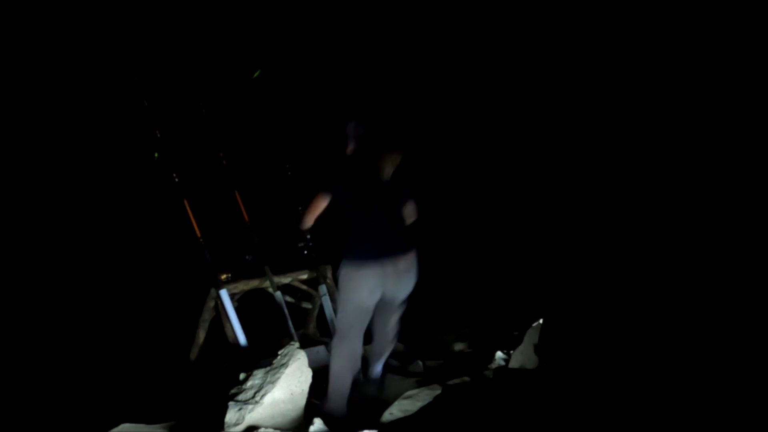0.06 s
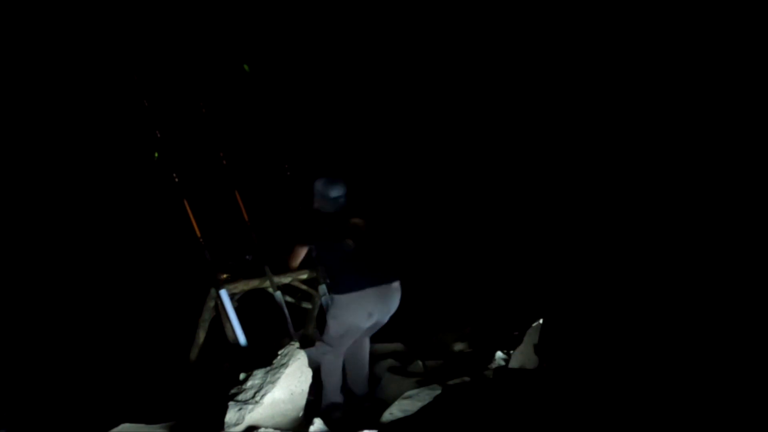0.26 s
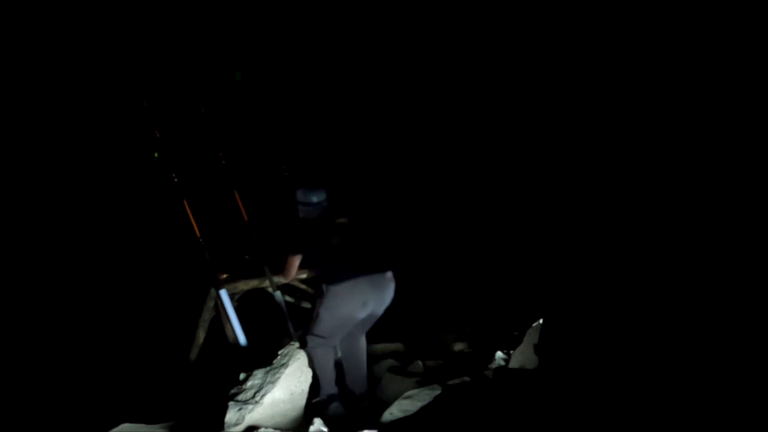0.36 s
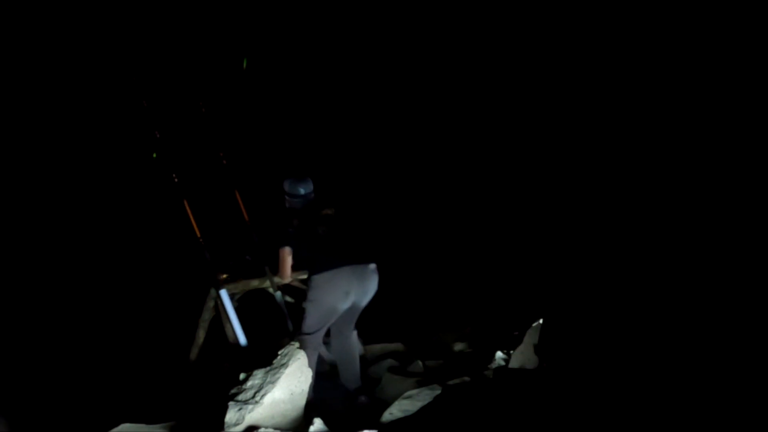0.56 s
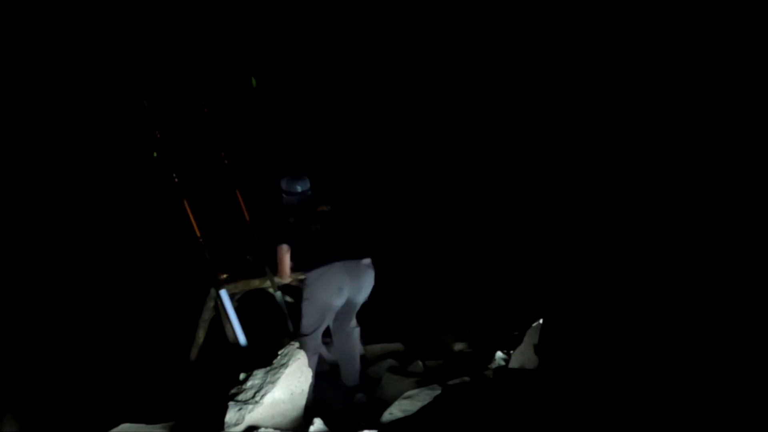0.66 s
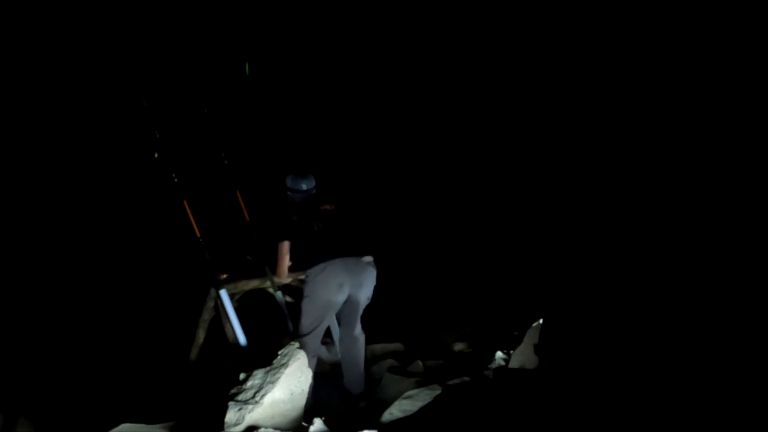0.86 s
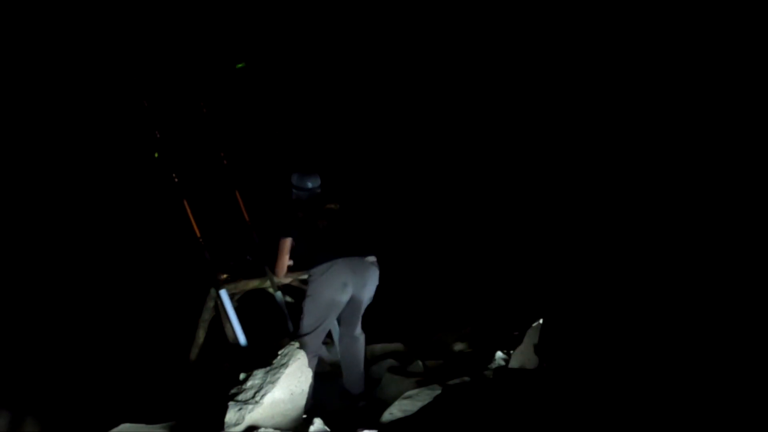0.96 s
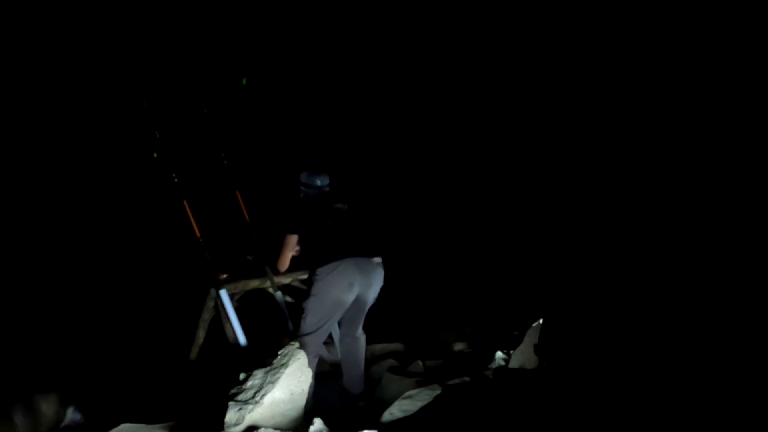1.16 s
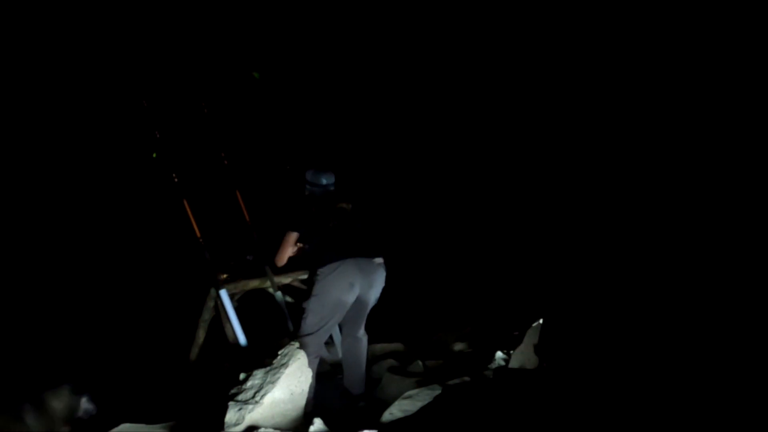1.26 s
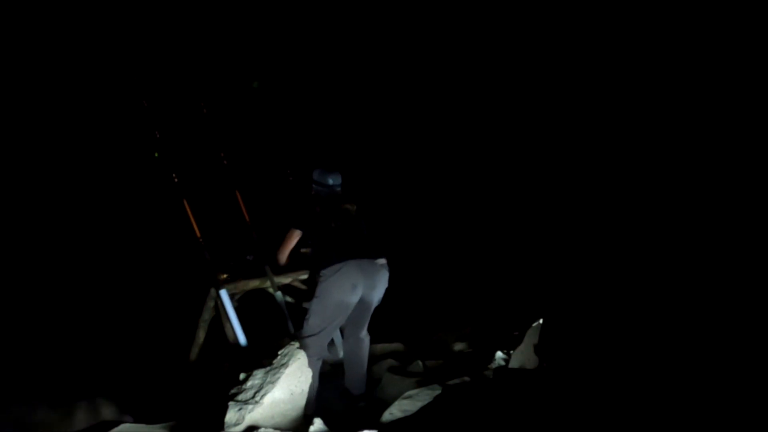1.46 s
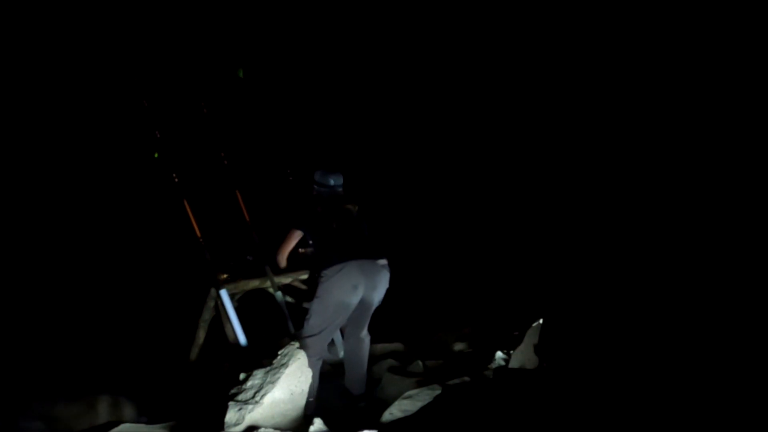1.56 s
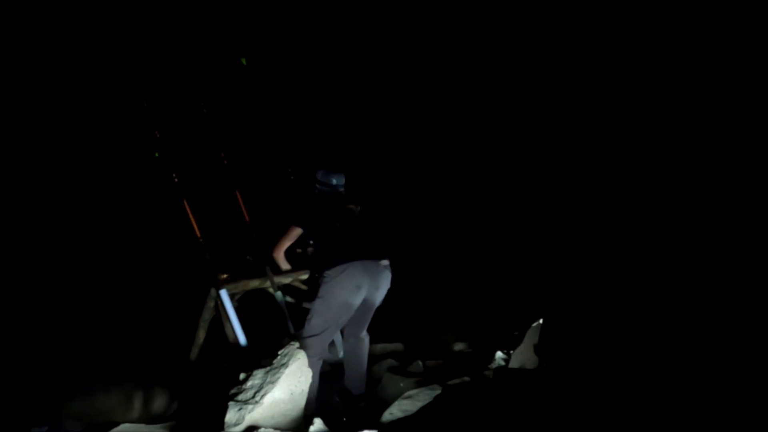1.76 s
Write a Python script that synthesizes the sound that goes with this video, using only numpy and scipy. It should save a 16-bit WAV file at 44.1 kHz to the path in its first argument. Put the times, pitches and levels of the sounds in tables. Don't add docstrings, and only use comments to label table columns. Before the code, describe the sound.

Lake water laps and trickles over shore rocks, with a hollow double knock of a rod near the start

```python
import sys
import numpy as np
from scipy import signal
from scipy.fft import rfft, irfft
from scipy.io import wavfile

SR = 44100
rng = np.random.default_rng(int(sys.argv[2]) if len(sys.argv) > 2 else 0)


def file_out(sig):
    cols = np.atleast_2d(sig).T
    lim = np.clip(cols, -1, 1)
    pcm = np.round(lim * 32767).astype(np.int16)
    wavfile.write(sys.argv[1], SR, pcm)


def magnitude_from_level(level_db):
    exponent = np.asarray(level_db, float) / 20
    return 10 ** exponent


N = 79380

# (frequency [Hz], level per Hz [dB])
NIGHT_COLOUR = [(24, -40), (40, -67), (93, -21), (186, 0.5), (745, -25.5), (1030, -10), (3470, -17.5),
                (7290, -27), (15000, -42)]
# (time [s], peak level [dB], pitch [Hz])
WIND_PUFFS = [(0.06, -47.5, 29.8), (0.186, -31.5, 55), (0.231, -38, 74), (0.28, -27.5, 55),
              (0.331, -42.5, 69.5), (0.851, -52.5, 31.4), (0.9, -62, 35), (0.975, -55, 35),
              (1.03, -43, 35.7), (1.074, -57.5, 52), (1.209, -38.5, 101), (1.531, -47.5, 34.2),
              (1.565, -50, 34.4), (1.603, -41.5, 112), (1.659, -58, 35)]
# (time [s], level [dB])
GURGLE_FLOW = [(0, -70), (.1, -54.5), (.2, -45.5), (.3, -38), (.36, -52), (.4, -37), (.46, -52), (.55, -74),
               (.62, -59), (.72, -61.5), (.85, -64.5), (1.03, -63.5), (1.22, -60), (1.38, -80.5),
               (1.6, -65.5), (1.8, -67.5)]
# (time [s], peak level [dB], pitch [Hz], decay t60 [s])
AIR_GULPS = [(0.02, -49, 258.5, 0.088), (0.087, -34.5, 269.4, 0.082), (0.118, -48.5, 440, 0.044),
             (0.135, -38.5, 288, 0.091), (0.174, -34, 200, 0.035), (0.203, -37, 272, 0.21),
             (0.235, -28.5, 352, 0.038), (0.277, -17, 190.4, 0.032), (0.281, -21.5, 424, 0.027),
             (0.301, -31.5, 437, 0.034), (0.331, -49, 168, 0.043), (0.479, -51, 173, 0.051),
             (0.538, -42.5, 305, 0.009), (0.557, -52, 173, 0.081), (0.625, -52, 126, 0.049),
             (0.701, -41.5, 162.5, 0.03), (0.774, -51.5, 221.4, 0.077), (0.828, -53, 174, 0.077),
             (0.899, -52, 302, 0.076), (0.95, -54.5, 220, 0.054), (1.031, -42.5, 217, 0.03),
             (1.141, -52.5, 269, 0.059), (1.206, -41, 278, 0.061), (1.256, -40, 187.7, 0.15),
             (1.556, -35.5, 170.6, 0.11), (1.603, -41.5, 196, 0.041), (1.67, -52.5, 245, 0.011),
             (1.764, -48, 370, 0.024)]
# (time [s], peak level [dB], upper modes' slope [dB/octave], lower modes' slope [dB/octave])
ROD_KNOCKS = [
    (0.266, -30.5, -21, -16),
    (.3752, -12.5, -4.5, 0),
    (.3815, -22.5, 17, 15.5),
    (.4240, -11, -3.5, -16),
    (0.4303, -21.5, -22.5, -37),
]
# (frequency [Hz], level [dB], decay t60 [s])
ROD_MODES = [(348, -23.5, 0.073), (470, -10.5, 0.05), (691.9, -4.5, 0.37), (928, -5, 0.12),
             (946.6, -3, 0.16), (1228, -12, 0.094), (1267, -28, 0.21), (1710, -20.5, 0.18),
             (1867, -7.5, 0.081), (2380, -46, 0.027)]
# (time [s], change of level [dB])
HAND_GRIPS = [
    (0.445, -16),
    (0.4773, -11),
]
# (time [s], level [dB])
TRICKLE_FLOW = [(0, -49.5), (.09, -61.5), (.3, -54), (.36, -62.5), (.46, -56), (.68, -71.5), (.82, -61.5),
                (.89, -62), (1.3, -61.5), (1.37, -60.5), (1.47, -69.5), (1.62, -50), (1.72, -63.5),
                (1.8, -59)]
# (frequency [Hz], width [Hz], level [dB])
DULL_GAPS = [(1055, 74, 7.5), (1216, 160, 5), (1590, 140, 7), (2000, 123, 6.5), (1750, 1680, -3.5)]
# (frequency [Hz], width [Hz], level [dB]); the last is a broad bed
BRIGHT_GAPS = [(2800, 250, -5), (3150, 200, -5), (3390, 130, -2), (3540, 90, 2), (4100, 300, -7),
               (4850, 250, -13), (5800, 600, -18), (3600, 4500, -15)]
# (time [s], peak level [dB], pitch [Hz])
DROPLETS = [(0.2543, -31.5, 6420), (.4793, -37, 5140), (0.634, -35, 5800), (0.7334, -46.5, 5400),
            (0.9278, -40.5, 7250), (0.984, -41, 6000), (1.031, -49, 5070), (1.072, -40.5, 6360),
            (1.089, -50, 4500), (1.095, -48, 5360), (1.108, -50, 6800), (1.1205, -60, 4520),
            (1.1387, -47, 5160), (1.156, -54, 4800), (1.1655, -33.5, 4260), (1.176, -44, 4400),
            (1.1896, -39, 6960), (1.3035, -48, 5070), (1.322, -29.5, 3570), (1.335, -36.5, 6700),
            (1.4072, -63, 7840), (1.417, -44.5, 3980), (1.4252, -43.5, 6460), (1.4556, -47, 7570),
            (1.518, -39, 6200), (1.577, -41.5, 7460), (1.638, -54, 4400), (1.694, -38, 6100),
            (1.7625, -47, 4300), (1.7863, -36.5, 6900)]
# (time [s], peak level [dB],
# dull part relative level [dB], decay t60 [s])
WATER_SLAPS = [(0.0074, -35, 4, 0.16), (0.0564, -31.5, -6, 0.033), (0.1098, -36.5, -28, 0.034),
               (0.1735, -38.5, -11, 0.12), (0.2355, -38, -16, 0.021), (0.2798, -27.5, 12, 0.073),
               (0.3805, -25.5, 17, 0.045), (0.4116, -35.5, 15, 0.099), (0.451, -39.5, 15, 0.065),
               (0.5219, -46.5, -25, 0.025), (0.5503, -40.5, 0, 0.062), (0.5661, -42, 3, 0.034),
               (0.58, -75, 14, 0.024), (0.628, -47.5, -13, 0.099), (0.704, -49, 15, 0.062),
               (0.7788, -49.5, 12, 0.3), (0.801, -46, 10, 0.11), (0.8221, -40, 7.5, 0.062),
               (0.8634, -67.5, 27.5, 0.063), (0.9327, -56.5, 27, 0.053), (0.9833, -36.5, 3.5, 0.059),
               (1.0064, -38.5, 0.5, 0.074), (1.0285, -58.5, 27, 0.079), (1.1052, -44.5, 7, 0.1),
               (1.1205, -45, 9.5, 0.06), (1.139, -40, -5, 0.059), (1.1896, -44, 8, 0.067),
               (1.25, -43, 12, 0.055), (1.273, -41, -1, 0.042), (1.281, -32.5, -1, 0.047),
               (1.3029, -38, 6, 0.064), (1.482, -40.5, 4.5, 0.023), (1.497, -38, -18, 0.025),
               (1.606, -64, 1, 0.035), (1.638, -35.5, 5, 0.15), (1.6448, -29.5, 2, 0.067),
               (1.7332, -32, 4.5, 0.052)]

LAG_S, LAG_SPREAD_S = 3.5e-5, 1.5e-5
SPLASH_TOP_HZ = 7180


def in_time(rows):
    s, level_db = np.transpose(rows)
    return np.interp(np.arange(N) / SR, s, level_db)


def rms_one(x):
    return x / np.sqrt(np.mean(x ** 2) + 1e-20)


def lowpass(x, order, hz):
    return signal.sosfilt(signal.butter(order, hz, fs=SR, output="sos"), x)


def drift(rate_hz):
    r = np.exp(-2 * np.pi * rate_hz / SR)
    slow = signal.lfilter([1], [1, -2 * r, r * r], rng.standard_normal(N + SR))
    return rms_one(slow[SR:])


def swell(t, attack_s, t60):
    return (1 - np.exp(-(t / attack_s) ** 2)) * magnitude_from_level(-60 * t / t60)


def resonate(x, hz, width_hz):
    r = np.exp(-np.pi * width_hz / SR)
    feedback = [1, -2 * r * np.cos(2 * np.pi * hz / SR), r * r]
    return signal.lfilter(np.array([1, 0, -1]) * (1 - r * r) / 2, feedback, x)


def gaps(x, table, spread_db, wander=0.0):
    total, sign = 0, 1
    for hz, width_hz, db in table:
        strength, detune = rng.standard_normal(2)
        total = total + sign * magnitude_from_level(db + spread_db * strength) * resonate(x, hz * (1 + wander * detune), width_hz)
        sign = -sign
    return rms_one(total)


def add(out, s, sound, pan_db=0.0, lag_s=0.0):
    size = len(sound) + 16
    delay = np.exp(-2j * np.pi * np.fft.rfftfreq(size, 1 / SR) * lag_s)
    left = irfft(rfft(sound, size) * delay, size)
    right = np.r_[sound, np.zeros(size - len(sound))]
    pair = np.array([left, right]) * magnitude_from_level(np.array([[pan_db / 2], [-pan_db / 2]]))
    i = int(s * SR)
    out[:, i:i + size] += pair[:, :N - i]


def night():
    level_db, sway_db, follow_flow, treble_alike = -60, 3, 0.4, 0.033
    hz = np.fft.rfftfreq(N, 1 / SR) + 1
    colour_hz, colour_db = np.transpose(NIGHT_COLOUR)
    colour = magnitude_from_level(np.interp(np.log(hz), np.log(colour_hz), colour_db))
    mid, side = rfft(rng.standard_normal((2, N))) * colour
    alike = 1 - (1 - treble_alike) * np.clip(hz / 6000, 0, 1) ** 0.5
    stereo = np.sqrt(1 + alike) * mid + np.sqrt(1 - alike) * side * [[1], [-1]]
    flow_db = in_time(TRICKLE_FLOW)
    breath_db = sway_db * drift(9.1) + follow_flow * (flow_db - flow_db.mean())
    return magnitude_from_level(level_db + breath_db) * rms_one(irfft(stereo, N))


def wind():
    level_db, side_db, puff_cycles = -76.5, 5.5, 1.3
    band = signal.butter(3, [18, 55], "band", fs=SR, output="sos")
    rumble = signal.sosfilt(band, rng.standard_normal((2, N + SR)))
    mid, side = rms_one(rumble[:, SR:])
    out = magnitude_from_level(level_db + 3.6 * drift(19.0)) * (mid + magnitude_from_level(side_db) * side * [[1], [-1]])
    for s, db, hz in WIND_PUFFS:
        turns = np.arange(int(SR * puff_cycles / hz)) / SR * hz
        puff = np.sin(2 * np.pi * turns) * np.sin(np.pi * turns / puff_cycles) ** 2
        add(out, s, magnitude_from_level(db) * puff, rng.normal(0, 1.0))
    return out


def gurgle():
    per_s, low_hz, high_hz, cycles = 320, 130, 500, 7
    uneven_db, tilt_db_per_octave = 2.5, -4
    sizes = magnitude_from_level(uneven_db * np.minimum(rng.exponential(1, N), 4)) * rng.choice([-1, 1], N)
    born = (rng.random(N) < per_s / SR) * sizes
    dealt = rng.integers(0, 12, N)
    rings = 0
    for k, hz in enumerate(np.geomspace(low_hz, high_hz, num=12)):
        ring = resonate(born * (dealt == k) + 1e-18, hz, 1.12 * hz / cycles)
        rings = rings + magnitude_from_level(tilt_db_per_octave * np.log2(hz / low_hz)) * resonate(ring, hz, hz)
    return magnitude_from_level(in_time(GURGLE_FLOW)) * rms_one(rings) * magnitude_from_level(np.array([[-0.6], [0.6]]))


def gulps():
    level_db, bend, wash_db, wash_db_per_halving, attack_share = 1, -0.072, -13, 6, 0.1
    out, t = np.zeros((2, N)), np.arange(SR // 3) / SR
    for s, db, hz, t60 in AIR_GULPS:
        fall_s = max(t60, 0.02)
        tone = np.sin(2 * np.pi * hz * t * (1 + bend * t / fall_s))
        wash = resonate(rng.standard_normal(len(t)), hz * 1.25, hz * 0.62)
        wash = rms_one(resonate(wash, hz * 1.25, hz * 0.62))
        roughness = magnitude_from_level(wash_db + wash_db_per_halving * np.log2(0.043 / fall_s))
        envelope = swell(t, 1 / hz + attack_share * t60, 0.71) * magnitude_from_level(-60 * (t / fall_s) ** 2)
        sound = (tone + roughness * wash) * envelope
        add(out, s, magnitude_from_level(db + level_db) * sound / abs(sound).max(), -1.2, LAG_S)
    return out


def surge():
    start_s, top_s, level_db, rise_db, t60 = 0.168, 0.299, -47.5, 2, 0.29
    hz, lump_db = 706, 2.0
    t, top = np.arange(SR // 2) / SR, top_s - start_s
    shape_db = np.where(t < top, rise_db * (t / top - 1), -60 * (t - top) / t60)
    shape_db = shape_db + lump_db * drift(42)[:len(t)]
    grains = rng.standard_normal(len(t)) * magnitude_from_level(5.8 * np.minimum(rng.exponential(1, len(t)), 4))
    crackle = rms_one(resonate(resonate(grains, hz, 810), hz, 2100))
    out = np.zeros((2, N))
    add(out, start_s, magnitude_from_level(level_db + shape_db) * crackle, -1.5, LAG_S)
    return out


def rod():
    level_db, attack_s, centre_hz, grip_s = -1.5, 0.0008, 940, 0.001
    thud_db, thud_hz, thud_t60, thud_top_hz = -13.5, 440, 0.046, 2600
    out, t = np.zeros((2, N)), np.arange(SR // 4) / SR
    for s, db, high_db, low_db in ROD_KNOCKS:
        sound = np.zeros(len(t))
        for hz, mode_db, t60 in ROD_MODES:
            slope_db = high_db if hz > centre_hz else low_db
            reach_db = slope_db * abs(np.log2(hz / centre_hz))
            sound += magnitude_from_level(mode_db + reach_db) * np.sin(2 * np.pi * hz * t) * swell(t, attack_s, t60)
        thud = resonate(rng.standard_normal(len(t)), thud_hz, 300)
        thud = thud + 0.28 * resonate(rng.standard_normal(len(t)), 2400, 630)
        thud = rms_one(lowpass(thud, 4, thud_top_hz))
        sound += magnitude_from_level(thud_db) * thud * swell(t, attack_s, thud_t60)
        add(out, s, magnitude_from_level(db + level_db) * sound, -2.0, LAG_S)
    now = np.arange(N) / SR
    damping_db = sum(db * np.clip((now - s) / grip_s, 0, 1) for s, db in HAND_GRIPS)
    return out * magnitude_from_level(damping_db)


def trickle():
    per_s, level_db, dull_db, grain_db, clump_db, wet_damping = 660, -4, -3.5, 3.5, 6, 5.5
    sizes = magnitude_from_level(grain_db * np.minimum(rng.exponential(1, (2, N)), 4)) * rng.choice([-1, 1], (2, N))
    struck = rng.random((2, N)) < per_s * magnitude_from_level(clump_db * drift(25)) / SR
    grains = lowpass(sizes * struck + 1e-18, 2, SPLASH_TOP_HZ)
    wet_gaps = [(hz, width_hz * wet_damping, db) for hz, width_hz, db in BRIGHT_GAPS[:-1]]
    bright = gaps(grains[0], wet_gaps + list(BRIGHT_GAPS[-1:]), 0)
    dull = gaps(grains[1], DULL_GAPS, 0)
    out = np.zeros((2, N))
    add(out, 0, magnitude_from_level(in_time(TRICKLE_FLOW) + level_db) * (bright + magnitude_from_level(dull_db) * dull), 0, LAG_S)
    return out


def drops():
    level_db, attack_s, t60 = -5.5, 0.00017, 0.007
    out, t = np.zeros((2, N)), np.arange(SR // 50) / SR
    for s, db, hz in DROPLETS:
        tick = resonate(rng.standard_normal(len(t)) * swell(t, attack_s, t60), hz, 0.23 * hz)
        tick = magnitude_from_level(db + level_db) * tick / abs(tick).max()
        add(out, s, tick, rng.normal(0, 1.2), LAG_S * rng.uniform(0, 1.46))
    return out


def slaps():
    level_db, dull_level_db, attack_s, grain_db = -1, -8.5, 0.00053, 1.66
    snap_db, snap_s = 2, 0.0018
    gap_spread_db, gap_wander = 2.5, 0.025
    out, t = np.zeros((2, N)), np.arange(SR // 5) / SR
    for s, db, dull_db, t60 in WATER_SLAPS:
        grain = magnitude_from_level(grain_db * np.minimum(rng.exponential(1, len(t)), 5))
        envelope = swell(t, attack_s, max(t60, 0.01)) * magnitude_from_level(snap_db * np.exp(-t / snap_s))
        burst = lowpass(rng.standard_normal((2, len(t))) * grain * envelope, 2, SPLASH_TOP_HZ)
        bright = gaps(burst[0], BRIGHT_GAPS, gap_spread_db, gap_wander)
        dull = gaps(burst[1], DULL_GAPS, gap_spread_db, gap_wander)
        sound = bright / abs(bright).max() + magnitude_from_level(dull_db + dull_level_db) * dull / abs(dull).max()
        lag_s = LAG_S + LAG_SPREAD_S * rng.standard_normal()
        add(out, s, magnitude_from_level(db + level_db) * sound, rng.normal(0, 1.0), lag_s)
    return out


def shore(x):
    level_db, attack_s, t60 = -9, 0.00047, 0.058
    t = np.arange(SR // 5) / SR
    echoes = rng.standard_normal((2, len(t))) * swell(t, attack_s, t60)
    echoes /= np.sqrt((echoes ** 2).sum(1, keepdims=True))
    return magnitude_from_level(level_db) * signal.fftconvolve(x, echoes, axes=1)[:, :N]


def scene():
    near = surge() + rod() + trickle() + drops() + slaps()
    return night() + wind() + gurgle() + gulps() + near + shore(near)


def roll_off(x):
    return signal.sosfilt(signal.butter(12, 15110, fs=SR, output="sos"), x)


def record(dry):
    shade_hz, shade_db, ceiling, cutoff_hz = 7900, -8, 0.43, 15700
    low = lowpass(dry, 5, shade_hz)
    high = signal.sosfilt(signal.butter(5, shade_hz, "high", fs=SR, output="sos"), dry)
    ports = low + magnitude_from_level(np.array([[shade_db], [0]])) * high
    rounded = ceiling * np.tanh(ports / ceiling)
    mix = signal.sosfilt(signal.cheby2(10, 60, cutoff_hz, fs=SR, output="sos"), rounded)
    return roll_off(mix)


dry = scene()
out = record(dry)
file_out(out)
```